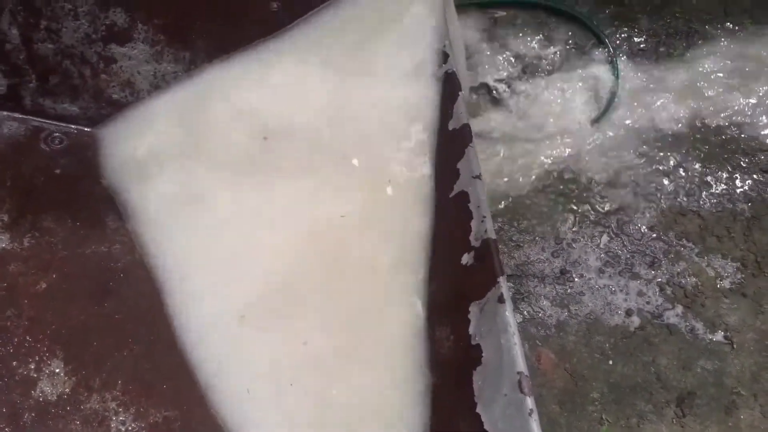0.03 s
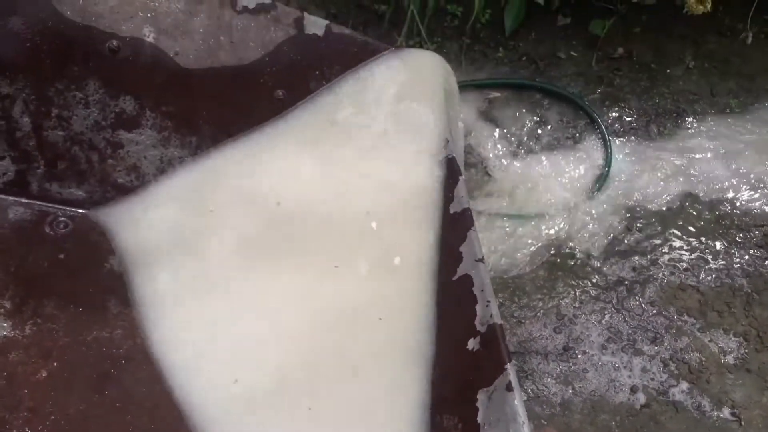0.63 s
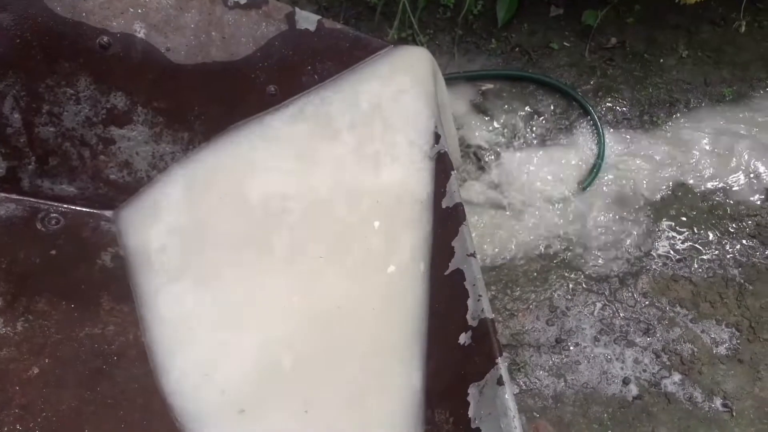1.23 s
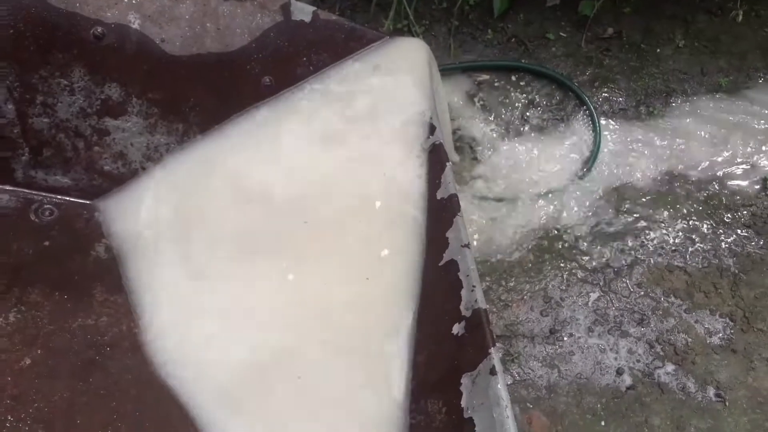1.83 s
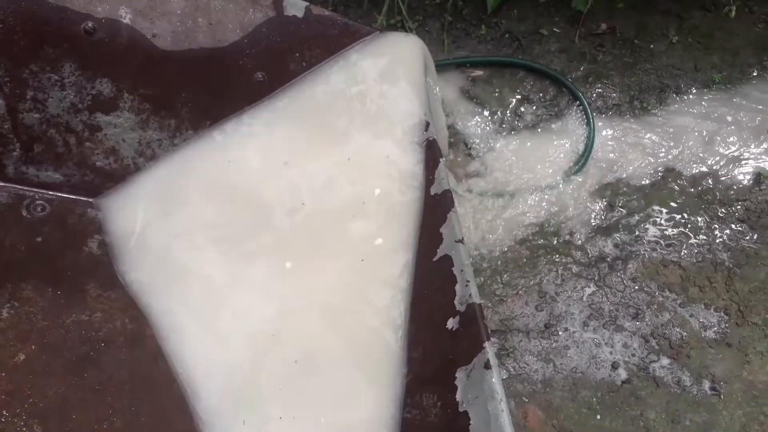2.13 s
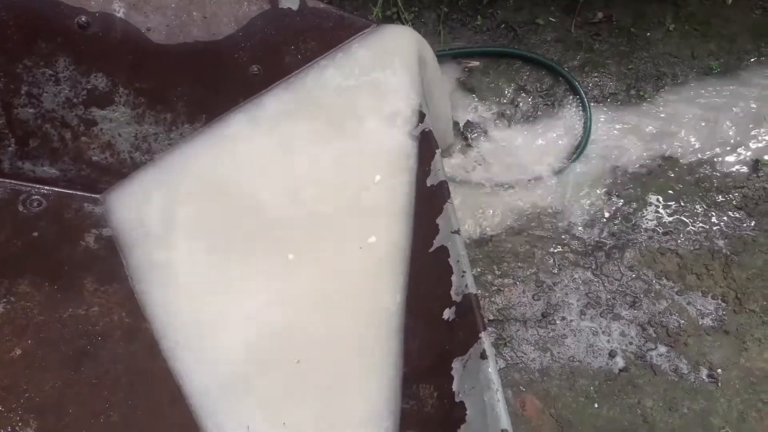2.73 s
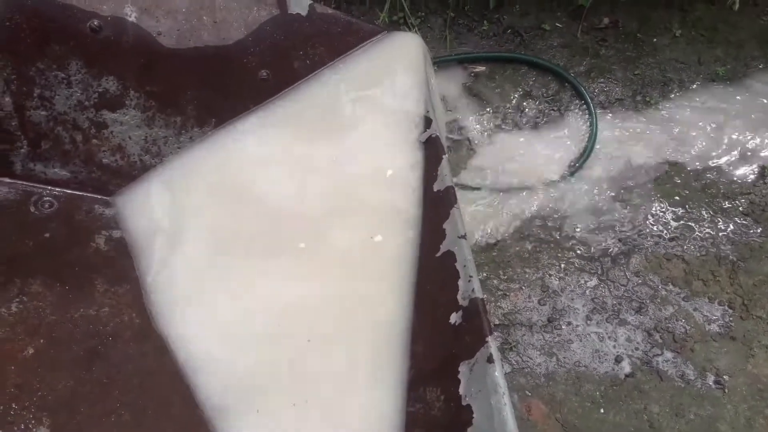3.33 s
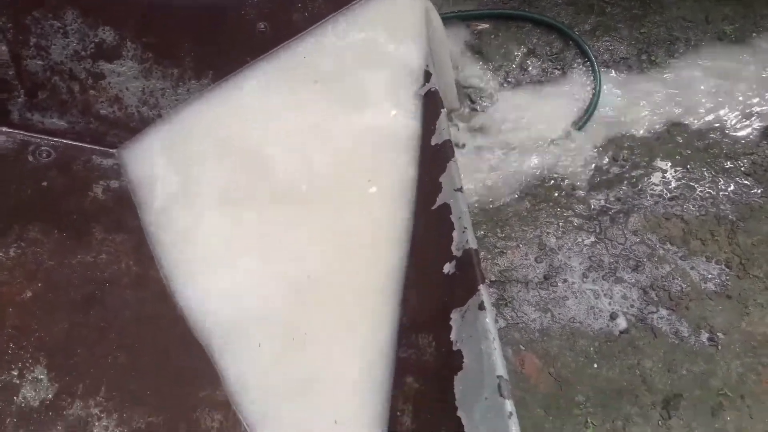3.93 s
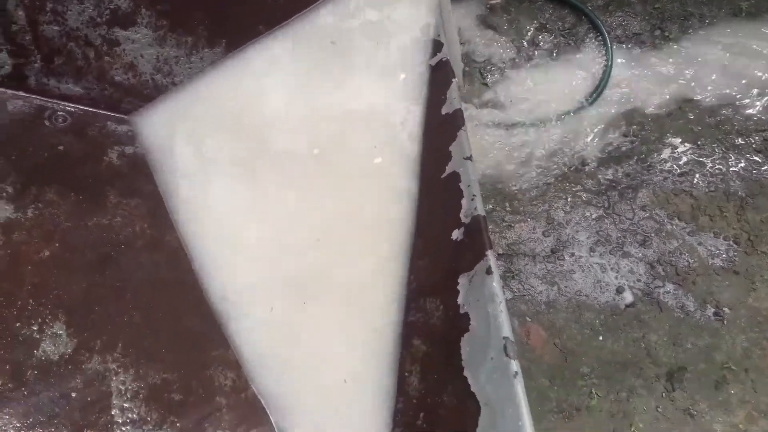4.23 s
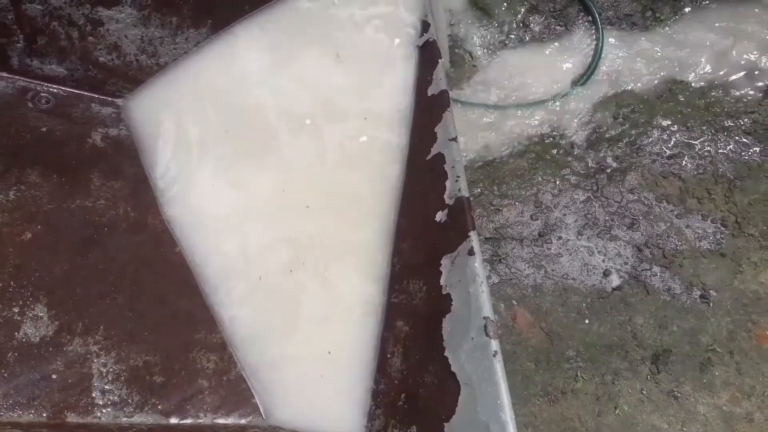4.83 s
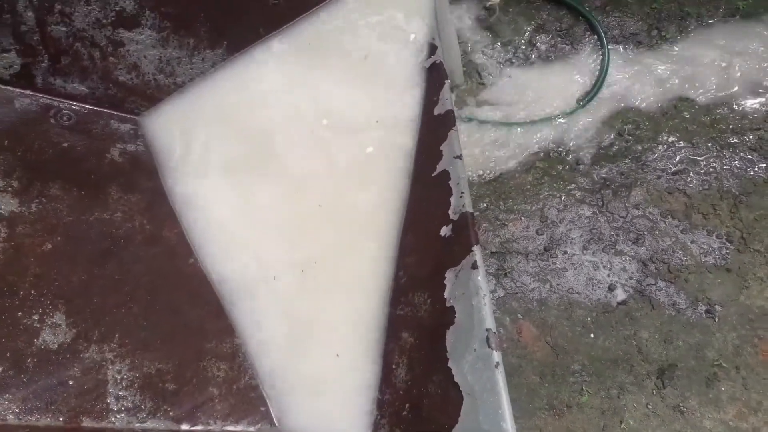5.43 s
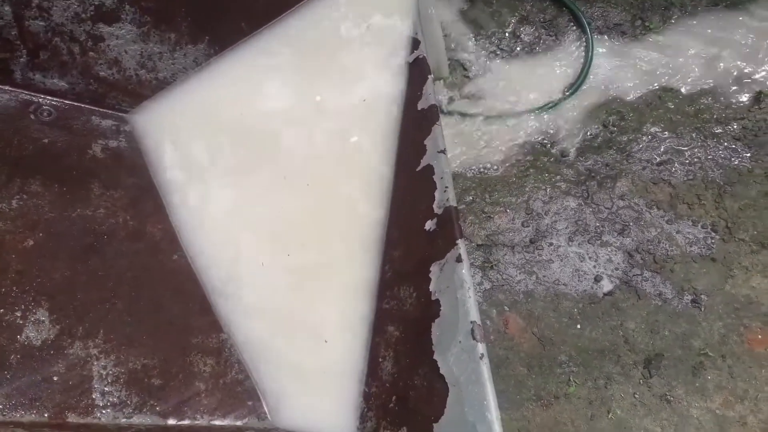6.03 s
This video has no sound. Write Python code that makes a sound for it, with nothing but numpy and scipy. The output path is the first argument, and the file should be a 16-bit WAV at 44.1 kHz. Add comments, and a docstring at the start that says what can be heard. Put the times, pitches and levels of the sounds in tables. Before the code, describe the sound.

Water spills over the edge of a steel trough and splatters continuously into its own puddle on hard ground. The splashing is close and bright, with fizzing spray, sharp drips and small bubbling plops. It surges unevenly at first, then thins somewhat in the second half. Outdoors, a light breeze faintly bumps the microphone, and two soft, dull scuffs pass near the end.

```python
"""Muddy water spills from a steel trough into its own puddle on hard ground, surging, then thinning.
The sheet breaks into lumps that splatter, throw fine spray and trap air as short-lived bubbles;
splatter, spray and froth follow the strength of the pour. The trough wall answers at once,
a light breeze nudges the microphone, and two dull scuffs pass near the end."""
import sys
import numpy as np
from scipy import signal
from scipy.fft import rfft, irfft, next_fast_len
from scipy.io import wavfile
from scipy.ndimage import map_coordinates

SR = 44100
rng = np.random.default_rng(int(sys.argv[2]) if len(sys.argv) > 2 else 0)


def inscribe(sig):
    """Save sig as 16-bit PCM at rate SR to the path in sys.argv[1].

    A 1-D sig is mono; a 2-D sig holds one channel per row.
    Samples are clipped to [-1, 1] before scaling.
    """
    pcm = np.round(np.clip(np.atleast_2d(sig).T, -1, 1) * 32767)
    wavfile.write(sys.argv[1], SR, pcm.astype(np.int16))


N = 268128
TIME = np.arange(N) / SR


def amp(db):
    """Decibels to gain."""
    return 10 ** (np.asarray(db) / 20)


def unit(x):
    """x at rms 1."""
    return x / np.sqrt(np.mean(x ** 2) + 1e-20)


def curves(rows):
    """One value per sample for each column after the time."""
    times, *columns = np.transpose(rows)
    return [np.interp(TIME, times, column) for column in columns]


def wobble(knots_per_s):
    """Smooth random curve."""
    return map_coordinates(rng.standard_normal(4096), [TIME * knots_per_s], mode="wrap")


def coloured(x, spectrum):
    """Minimum-phase filter; spectrum rows: f/Hz, gain/dB."""
    m = next_fast_len(N + 8192, True)
    hz, db = np.transpose(spectrum)
    gain = amp(np.interp(np.log(np.fft.rfftfreq(m, 1 / SR) + 1), np.log(hz), db))
    cepstrum = irfft(np.log(gain), m)
    cepstrum[1:m // 2] *= 2
    cepstrum[m // 2 + 1:] = 0
    return irfft(rfft(x, m) * np.exp(rfft(cepstrum)), m)[:N]


def sizes(spread_db, count):
    """Random gains, exponentially distributed in dB, capped."""
    return amp(spread_db * np.minimum(rng.exponential(size=count), np.log(90)))


def strays(per_s, level_db, scatter_db=5.5):
    """Random events scattered round level_db; rows: t/s, level/dB, normal draw."""
    draws = rng.standard_normal((200, 2))
    times = np.cumsum(rng.uniform(0, 2, 200)) / per_s
    return [(s, level_db[int(s * SR)] + scatter_db * a, b)
            for s, (a, b) in zip(times, draws) if s * SR < N]


def landings(per_s, decay_s):
    """Curve that jumps as water lands and sinks back; mean near 0, rms 1."""
    hits = (rng.random(N) < per_s / SR) - per_s / SR
    jumps = signal.lfilter([1], [1, -np.exp(-1 / (decay_s * SR))], hits)
    return unit(np.minimum(unit(jumps), 2))


def impacts(per_s, spread_db):
    """Random droplet impacts, rms 1."""
    return unit((rng.random(N) < per_s / SR) * rng.choice([-1, 1], N) * sizes(spread_db, N))


def bubble(t, hz, t60_s, rise=0.16):
    """Trapped air swells within a cycle and rings; pitch climbs as it nears the surface."""
    swell = 1 - np.exp(-(hz * t) ** 2)
    return np.sin(2 * np.pi * hz * t * (1 + rise * t / t60_s)) * amp(-60 * t / t60_s) * swell


def swarm(centre_hz, octaves, cycles, spread_db, count, samples):
    """Bubbles of random onset, pitch and life, rms 1."""
    start = rng.integers(0, N, (count, 1))
    hz = centre_hz * 2 ** (octaves * np.clip(rng.standard_normal((count, 1)), -2, 2))
    t60_s = cycles / hz * 2 ** rng.uniform(-0.68, 1, (count, 1))
    t = np.minimum(np.float32(np.arange(samples) / SR), np.float32(2 * t60_s))
    rings = sizes(spread_db, count)[:, None] * bubble(t, np.float32(hz), np.float32(t60_s))
    return unit(np.bincount((start + np.arange(samples)).ravel(), rings.ravel(), N)[:N])


def air():
    """Low puffs of breeze on the microphone over a faint outdoor rumble."""
    # gusts: t/s, level/dB, Gaussian width/s
    puffs = [(0.689, -53.5, 0.015), (0.796, -57, .011), (0.89, -50, 0.0092), (2.34, -57, 0.016),
             (2.51, -61, .01), (2.703, -58, 0.01), (2.803, -56, 0.024), (2.946, -56.5, 0.017),
             (3.613, -60, .012), (3.73, -50, 0.016), (4.086, -56, 0.026), (4.197, -46, 0.0063),
             (4.339, -41, 0.015), (4.533, -39, 0.014), (4.58, -41, 0.0081), (4.65, -55, 0.017),
             (5.98, -57, 0.032)]
    # breeze and rumble spectra: f/Hz, level/dB
    breeze_spectrum = [(15, -36), (40, -10), (70, 2.5), (105, 1.5), (170, -7), (260, -19.5), (500, -46),
                       (1500, -104)]
    rumble_spectrum = [(20, -23), (60, -2), (100, 4.5), (200, -5.5), (400, -10.5), (1000, -43),
                       (8000, -22.5)]
    gusts = sum(amp(db) * np.exp(-.5 * ((TIME - s) / width_s) ** 2) for s, db, width_s in puffs)
    breeze = gusts * unit(coloured(rng.standard_normal(N), breeze_spectrum))
    return breeze + amp(-68) * unit(coloured(rng.standard_normal(N), rumble_spectrum))


def scuffs(attack_s=.022, tone_hz=400, tone_db=-57.5, tone_width_s=0.026):
    """Dull rubbing noise starts quickly and trails into a faint, rough tone."""
    # rubs: t/s, level/dB, t60/s, tone delay/s
    rubs = [(4.865, -43.5, 0.55, 0.19), (5.439, -41, 0.34, 0.26)]
    # rubbing spectrum: f/Hz, level/dB
    rub_spectrum = [(40, -16), (100, -4), (165, 2), (270, -7.5), (380, 1), (520, 2.5), (600, -6), (680, 2),
                    (760, -5), (850, -3.5), (1200, -15), (4000, -30)]
    envelope, t = np.zeros(N + SR), np.arange(SR // 2) / SR
    for s, db, t60_s, _ in rubs:
        envelope[round(s * SR):][:len(t)] += amp(db - 60 * t / t60_s) * (1 - np.exp(-t / attack_s))
    swells = sum(np.exp(-.5 * ((TIME - s - delay_s) / tone_width_s) ** 2) for s, _, _, delay_s in rubs)
    tone = amp(tone_db) * swells * np.sin(2 * np.pi * tone_hz * TIME + 0.8 * wobble(110))
    return envelope[:N] * unit(coloured(rng.standard_normal(N), rub_spectrum)) + tone


def trough_echo(water, hop=2048, t60_s=.05, delay_s=.0012):
    """Short, duller echo off steel wall and ground; a new tail each hop, as the splash moves about."""
    t, window = np.arange(SR // 16) / SR, np.sqrt(np.hanning(2 * hop))
    padded, echo = np.pad(water, (hop, 2 * hop)), np.zeros(N + SR)
    for i in range(0, N + hop, hop):
        tail = rng.standard_normal(len(t)) * amp(-60 * t / t60_s) * (t > delay_s)
        piece = signal.fftconvolve(padded[i:i + 2 * hop] * window, tail / np.linalg.norm(tail))
        echo[i:i + len(piece)] += piece
    return coloured(echo[hop:hop + N], [(3000, 0), (8000, -6), (15000, -12)])


def squirts():
    """Spray forced through foam: tiny bubbles of like size make a narrow, bright sizzle."""
    # jets of spray: t/s, level/dB, length/s
    jets = [(1.982, -36, 0.063), (2.081, -37, 0.015)]
    # sizzle spectrum: f/Hz, level/dB
    sizzle_spectrum = [(3000, -44), (4100, -9), (4400, 1), (5000, -3), (5400, -16), (7000, -41)]
    envelope = np.zeros(N)
    for s, db, length_s in jets:
        progress = np.clip((TIME - s) / length_s, 0, 1)
        envelope += amp(db) * np.sqrt(np.abs(np.sin(np.pi * progress)))
    sizzle = swarm(4700, octaves=0.1, cycles=24, spread_db=0.5, count=6000, samples=260)
    return envelope * unit(coloured(sizzle, sizzle_spectrum))


def zips():
    """A bubble opening at the surface sweeps upward within milliseconds."""
    # bursting bubbles: t/s, level/dB, start f/Hz, end f/Hz, length/s
    bursts = [(.1732, -29, 3010, 5170, 0.0079), (0.716, -22.5, 2440, 9100, 0.0027),
              (3.462, -28.5, 8500, 10100, 0.0034), (3.7934, -24, 2700, 4880, 0.0034),
              (5.0812, -23.5, 6600, 10800, 0.0019)]
    out, t = np.zeros(N + SR), np.arange(SR // 50) / SR
    for s, db, start_hz, end_hz, length_s in bursts:
        progress = np.clip(t / length_s, 0, 1)
        phase = 2 * np.pi * np.cumsum(start_hz * (end_hz / start_hz) ** progress) / SR
        envelope = np.sqrt(np.abs(np.sin(np.pi * progress)))
        out[round(s * SR):][:len(t)] += amp(db) * envelope * np.sin(phase)
    return out[:N]


def smacks(crossover_hz=4470):
    """A heavy lump hits the puddle: one hard slap, then a scatter of droplets."""
    # heavy lumps: t/s, relative level/dB, t60/s, treble gain/dB
    hits = [(.2516, -19, .011, 2), (.6, -15.5, 0.017, -15), (.812, -21.5, 0.3, -6),
            (1.522, -19.5, 0.015, 5), (2.142, -17, .008, -4), (2.151, -15, 0.0098, -6),
            (2.2874, -9.5, 0.012, -16), (2.29, -22, 0.11, -16), (3.549, -26, 0.013, 8),
            (3.6655, -18, 0.011, 0), (3.797, -20, 0.03, 1), (3.818, -25.5, 0.2, 1), (4.101, -21, .07, -11),
            (4.953, -26, .015, -3), (5.054, -32, 0.033, 7), (5.8042, -21, 0.012, 2)]
    # slap spectrum: f/Hz, level/dB
    slap_spectrum = [(400, -49), (1100, -9.5), (2200, 3.5), (4300, 4.5), (5800, -5), (8000, -4),
                     (10500, -22), (16000, -16)]
    out, t = np.zeros(N + SR), np.arange(SR // 5) / SR
    for s, db, t60_s, treble_db in hits:
        burst = rng.standard_normal(len(t)) * amp(-60 * t / t60_s)
        burst[0] = 3  # the slap
        body = signal.lfilter(*signal.butter(1, crossover_hz, fs=SR), burst)
        out[round(s * SR):][:len(t)] += amp(db - 5) * (body + amp(treble_db) * (burst - body))
    return coloured(out[:N], slap_spectrum)


def drops(level_db, t60_s=0.0027, crack_db=-6, stray_hz=8850):
    """Near drops slap wet ground: a sharp crack and the rising ping of a tiny bubble."""
    # loudest drops: t/s, relative level/dB, ping f/Hz
    loud = [(.1254, -20, 7900), (.2533, -13.5, 8450), (.3167, -17, 8400), (0.3793, -16.5, 8400),
            (.5467, -20, 8200), (.6372, -18.5, 8360), (.8501, -28, 8800), (.9399, -20, 8200),
            (1.0113, -14, 8100), (1.0697, -15, 8400), (1.0941, -16.5, 8400), (1.252, -14.5, 8300),
            (1.3055, -11.5, 9600), (1.3265, -13, 7800), (1.4834, -13, 8700), (1.5633, -16, 8400),
            (1.5857, -21, 9000), (1.5955, -14.5, 7800), (1.6195, -18, 8950), (1.7358, -13.5, 8600),
            (1.8607, -16, 7600), (1.9021, -18, 8000), (1.9762, -18, 8900), (2.1744, -19, 8900),
            (2.2039, -19, 8600), (2.3364, -21, 8300), (2.3847, -18, 8100), (2.619, -18, 6700),
            (2.7346, -16, 7500), (2.8698, -15, 8400), (2.8824, -14, 7850), (2.972, -19, 8300),
            (2.9837, -12, 7940), (3.1257, -15, 7700), (3.251, -19, 8400), (3.3898, -16, 7800),
            (3.5163, -23, 8800), (3.5339, -18, 7700), (3.557, -18, 8300), (3.6646, -17.5, 7200),
            (3.709, -19, 8500), (3.7991, -9.5, 7350), (3.8142, -19, 8800), (3.8185, -16, 7400),
            (4.004, -16.5, 7750), (4.0312, -22, 9000), (4.1201, -19, 8400), (4.147, -20, 8400),
            (4.1888, -19, 7800), (4.2756, -9.5, 8350), (4.4449, -32, 8500), (4.4613, -23, 7900),
            (4.9289, -21.5, 10300), (4.9687, -27, 8100), (5.1489, -21, 14500), (5.202, -22, 14500),
            (5.4484, -18, 13500), (5.5569, -28, 7500), (5.772, -23, 12000), (5.8717, -16, 14800),
            (5.9479, -22.5, 10600)]
    out, t = np.zeros(N + SR), np.arange(SR // 100) / SR
    stray = [(s, db, stray_hz * np.exp(0.23 * z))
             for s, db, z in strays(per_s=5, level_db=level_db + 9.5)]
    for s, db, hz in loud + stray:
        crack = np.diff(rng.standard_normal(len(t) + 1)) / 2 * amp(-60 * t / t60_s)
        attack = 1 - np.exp(-hz * t / 2)
        tick = (bubble(t, hz, t60_s, rise=0.048) + amp(crack_db) * crack) * attack
        out[round(s * SR):][:len(t)] += amp(db - 0.5) * tick / np.abs(tick).max()
    return out[:N]


def plops(level_db, stray_hz=2050, stray_octaves=0.226, stray_cycles=23):
    """Single bubbles stand out of the froth; each sheds four fragments that ring just after it."""
    # loudest bubbles: t/s, relative level/dB, f/Hz, t60/s
    loud = [(.03, -20.5, 2330, 0.012), (.15, -21, 1280, 0.01), (0.2516, -16.5, 2450, 0.014),
            (.269, -37.5, 670, 0.045), (.401, -19, 1505, 0.017), (.407, -22, 1560, 0.016),
            (.842, -21.5, 1660, 0.014), (0.919, -21, 1410, 0.017), (.987, -21.5, 3320, 0.022),
            (1.0213, -18, 2610, 0.01), (1.201, -22, 2460, 0.015), (1.223, -17.5, 2240, 0.025),
            (1.33, -18, 3880, 0.0053), (1.358, -24, 1490, .018), (1.399, -22.5, 2210, 0.023),
            (1.464, -17.5, 2090, 0.026), (1.7627, -19, 3100, 0.013), (1.872, -17.5, 2170, 0.0085),
            (1.921, -34, 980, 0.021), (1.938, -29.5, 1080, 0.013), (1.9973, -23.5, 1640, 0.038),
            (2.1135, -23.5, 3600, 0.0054), (2.1763, -21, 1880, .019), (2.201, -19, 2500, .011),
            (2.236, -24.5, 2390, 0.017), (2.272, -20.5, 1330, 0.01), (2.2875, -19, 1900, .012),
            (2.4255, -23, 1400, 0.015), (2.4498, -31.5, 1220, 0.021), (2.556, -23, 3420, 0.019),
            (2.915, -27, 1540, 0.025), (3.0883, -23, 1770, 0.0095), (3.1, -28, 1160, 0.015),
            (3.163, -25, 2200, 0.0075), (3.172, -35, 706, 0.019), (3.251, -36, 613, .03),
            (3.276, -35, 780, 0.024), (3.322, -22, 1840, 0.0063), (3.601, -29.5, 1490, 0.013),
            (3.622, -26, 1870, .012), (3.631, -24, 3450, .009), (3.692, -23, 4650, .006),
            (3.76, -28.5, 1350, 0.026), (3.7945, -23, 2450, .01), (3.836, -23, 2550, 0.012),
            (3.8402, -31, 1220, 0.019), (3.911, -27, 1440, 0.018), (3.9501, -24.5, 1880, 0.013),
            (4.005, -27.5, 1600, .03), (4.167, -30, 1210, 0.015), (4.412, -34, 2380, 0.016),
            (4.484, -28.5, 1620, 0.026), (4.582, -29, 2700, .01), (4.599, -24.5, 1960, 0.0092),
            (4.683, -27, 4400, 0.018), (5.016, -21.5, 4550, 0.0088), (5.033, -30, 1680, 0.016),
            (5.075, -27, 1260, 0.016), (5.091, -30, 1480, 0.016), (5.119, -32, 1690, 0.017),
            (5.314, -34, 1740, .014), (5.325, -27, 1600, 0.017), (5.427, -22, 2090, 0.013),
            (5.436, -29, 1830, .012), (5.4587, -25, 1890, 0.013), (5.512, -29, 2130, .012),
            (5.586, -25.5, 1720, 0.012), (5.598, -24.5, 1750, 0.014), (5.635, -27.5, 1700, 0.032),
            (5.715, -30, 1700, 0.015), (5.914, -26, 2650, 0.018), (5.9678, -21.5, 2180, 0.011)]
    swell_cycles = 0.7
    fragment_db, fragment_cycles, fragment_octaves = -11.5, 11.8, 0.5
    out, t = np.zeros(N + SR), np.arange(SR // 20) / SR
    stray = []
    for s, db, z in strays(per_s=5, level_db=level_db + 5.5):
        hz = stray_hz * 2 ** (stray_octaves * z)
        stray.append((s, db, hz, stray_cycles / hz))
    for s, db, hz, t60_s in loud + stray:
        ring = bubble(t, hz, t60_s, rise=0.075) * (1 - np.exp(-hz * t / swell_cycles))
        for late, higher in rng.random((4, 2)):
            age_s = np.maximum(t - late * .6 * t60_s, 0)
            fragment_hz = hz * 2 ** (fragment_octaves * (higher - 1 / 4))
            ring += amp(fragment_db) * bubble(age_s, fragment_hz, fragment_cycles / hz)
        out[round(s * SR):][:len(t)] += amp(db - 3.5) * ring / np.abs(ring).max()
    return out[:N]


def puddle(level_db, lumps):
    """A strong stream drags under dense froth, a weak one fewer, smaller bubbles; glugs churn below."""
    # spectra of froth, trickle, large bubbles and deep rush: f/Hz, level/dB
    froth_spectrum = [(300, -39.5), (700, -22.5), (980, -16.5), (1170, -3.5), (1400, -3.5), (1550, -1.5),
                      (2600, -1.5), (2950, -10.5), (4600, -8), (5800, -31), (10000, -36)]
    trickle_spectrum = [(300, -63), (950, -15.5), (1180, -6), (1400, -8), (1620, -1), (2700, -2.5),
                        (3100, -25), (4600, 9.5), (5800, -14), (10000, -28)]
    glug_spectrum = [(250, -51), (500, -4), (680, -2.5), (850, 2), (1020, 1), (1600, -13), (4000, -63)]
    rush_spectrum = [(100, -15.5), (230, -7), (340, -0.5), (480, 3), (650, -2), (1000, -25.5), (4000, -68)]
    # churning: t/s, glug level/dB, rush level/dB
    churn = [(0, -50, -62), (.1, -63, -85), (.3, -52, -81), (.42, -62, -71.5), (.65, -65, -66),
             (.92, -53, -63), (1.12, -58, -64), (1.4, -54, -73), (1.55, -61.5, -81), (1.7, -73, -85),
             (1.95, -58.5, -73), (2.08, -71, -73), (2.32, -59, -55), (2.48, -55.5, -61.5), (2.68, -62, -66),
             (2.8, -55.5, -52), (3.08, -60.5, -72.5), (3.28, -55.5, -65), (3.4, -70, -73), (3.7, -76, -83),
             (3.8, -69, -75), (4.1, -58.5, -68), (4.42, -81, -82), (4.65, -74, -70), (5.2, -72, -85),
             (5.36, -78, -78), (5.58, -57, -72), (6.07, -77, -74)]
    froth = swarm(1902, octaves=0.665, cycles=21, spread_db=-1, count=8000, samples=420)
    froth = unit(coloured(froth + amp(4.5) * rng.standard_normal(N), froth_spectrum))
    trickle = swarm(2100, octaves=.42, cycles=18, spread_db=1.9, count=5000, samples=560)
    trickle = unit(coloured(trickle + amp(-8.5) * rng.standard_normal(N), trickle_spectrum))
    plunge = np.clip((level_db + 46) / 10, 0, 1)
    blend = np.sqrt(plunge) * froth + np.sqrt(1 - plunge) * trickle
    gurgle = unit(amp(0.34 * lumps + 1.63 * landings(per_s=54, decay_s=0.0097)) * blend)
    glugs = swarm(783, octaves=0.269, cycles=16.7, spread_db=0.8, count=1300, samples=1100)
    glugs = unit(coloured(glugs + amp(-18) * rng.standard_normal(N), glug_spectrum))
    rush = unit(coloured(amp(3.5 * lumps) * rng.standard_normal(N), rush_spectrum))
    glug_db, rush_db = curves(churn)
    return amp(level_db - 0.65) * gurgle + amp(glug_db) * glugs + amp(rush_db) * rush


def splatter(level_db, lumps):
    """Each lump of water lands as a cluster of impacts and throws off fine spray."""
    # impact and spray spectra: f/Hz, level/dB
    slap_spectrum = [(300, -54), (600, -39), (900, -27.5), (1400, -8.5), (2600, -1), (3500, -3.5),
                     (4700, -3.5), (5200, -5), (5600, -16), (5950, -21.5), (6400, -5.5), (7200, -8),
                     (8200, -1), (9200, -3), (10300, -14.5), (16000, -12)]
    spray_spectrum = [(2000, -23), (6000, -2), (8000, -16), (11300, 7), (12400, 4), (14000, 7.5),
                      (16000, 2)]
    average_pour_db, average_spray_db, spray_db_per_db = -38.5, -45.5, 0.31
    clusters = lumps + 0.5 * landings(per_s=720, decay_s=0.0033)
    slaps = impacts(per_s=4200, spread_db=2.5) + amp(-4) * rng.standard_normal(N)
    slaps = unit(coloured(amp(2.7 * clusters + 0.79 * wobble(150)) * slaps, slap_spectrum))
    # tiny bubbles ping and burst on the wet ground
    pips = swarm(4177, octaves=0.189, cycles=42, spread_db=5, count=4000, samples=220)
    fizz = swarm(7916, octaves=0.13, cycles=19.7, spread_db=3.5, count=9000, samples=200)
    fizz = unit(amp(2.64 * landings(per_s=250, decay_s=0.0022)) * fizz)
    splash = unit(slaps + amp(-11) * pips + amp(-2) * fizz)
    crackle = swarm(12040, octaves=0.54, cycles=13, spread_db=1.5, count=15000, samples=80)
    spray = crackle + amp(-1) * impacts(per_s=3000, spread_db=4) + amp(-10) * rng.standard_normal(N)
    spray = unit(coloured(amp(3.6 * landings(per_s=280, decay_s=0.0032)) * spray, spray_spectrum))
    spray_db = average_spray_db + spray_db_per_db * (level_db - average_pour_db)
    return amp(level_db + 1.1) * splash + amp(spray_db) * spray


def scene():
    """The same lumps of falling water drive splatter and puddle; mono."""
    # pour strength: t/s, bubbling level/dB, splatter level/dB
    pour = [(0, -38.5, -36), (.15, -38.5, -35.5), (.21, -41.5, -39), (0.33, -38.5, -36.5), (0.48, -46, -39),
            (0.62, -40, -40), (.68, -43, -36), (0.795, -40, -35.5), (0.82, -38, -33.5), (.9, -36.5, -33.5),
            (1.01, -35, -34.5), (1.07, -39.5, -35), (1.23, -38.5, -35), (1.42, -40.5, -37),
            (1.56, -42, -37), (1.71, -43, -40.5), (1.84, -42.5, -36), (1.87, -38, -33), (1.95, -41, -39.5),
            (2.08, -43.5, -39), (2.275, -40.5, -35.5), (2.295, -36.5, -36), (2.38, -40.5, -37.5),
            (2.55, -38.5, -36), (3.04, -39, -36), (3.15, -39, -38), (3.42, -46, -43), (3.72, -46.5, -38.5),
            (3.82, -43, -39.5), (3.89, -43, -39), (4.13, -41, -38.5), (4.25, -47.5, -40),
            (4.38, -44.5, -42), (4.75, -47.5, -46), (4.81, -46.5, -42), (4.92, -46, -43.5),
            (5.2, -52.5, -42), (5.42, -43.5, -42.5), (5.58, -45, -40.5), (6.07, -44.5, -41)]
    bubbling_db, splatter_db = curves(pour)
    lumps = 0.5 * wobble(35) + 0.5 * landings(per_s=110, decay_s=0.0027)
    water = splatter(splatter_db, lumps) + puddle(bubbling_db, lumps)
    water += plops(bubbling_db) + drops(splatter_db) + zips() + smacks() + squirts()
    echo = amp(-10) * trough_echo(water)
    return (water + echo + air() + scuffs())[None]


def record(dry, cutoff_hz=15850):
    """Brick-wall low-pass."""
    m = next_fast_len(N + 8192, True)
    return irfft(rfft(dry, m) * (np.fft.rfftfreq(m, 1 / SR) < cutoff_hz), m)[:, :N]


dry = scene()
out = record(dry)
inscribe(out)
```